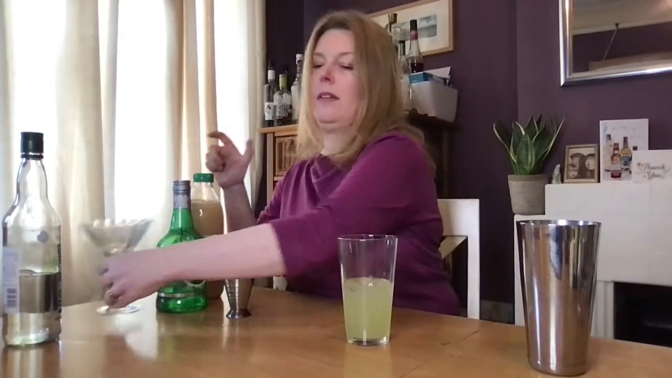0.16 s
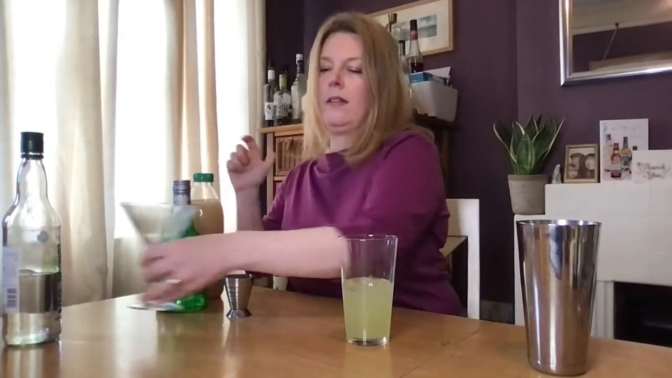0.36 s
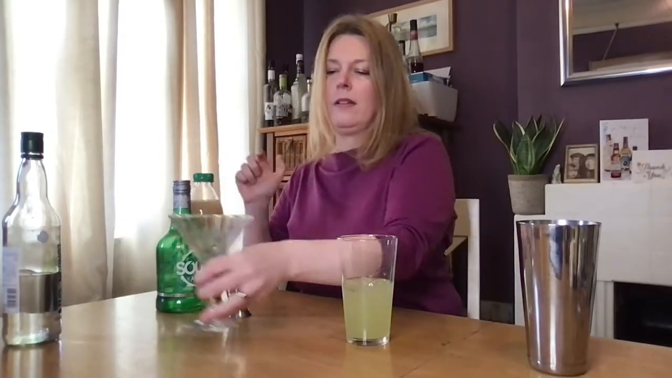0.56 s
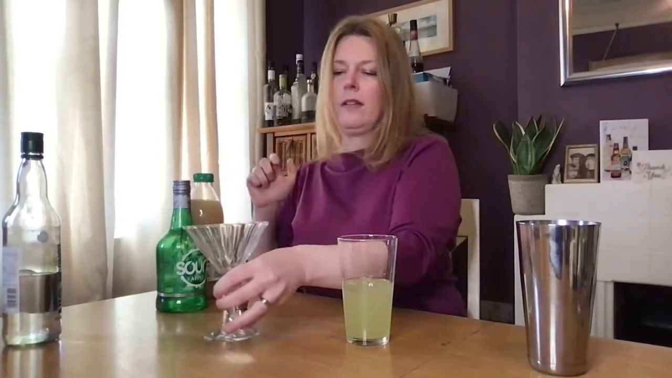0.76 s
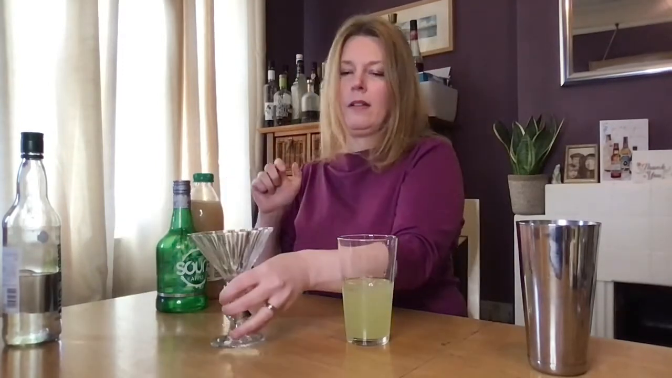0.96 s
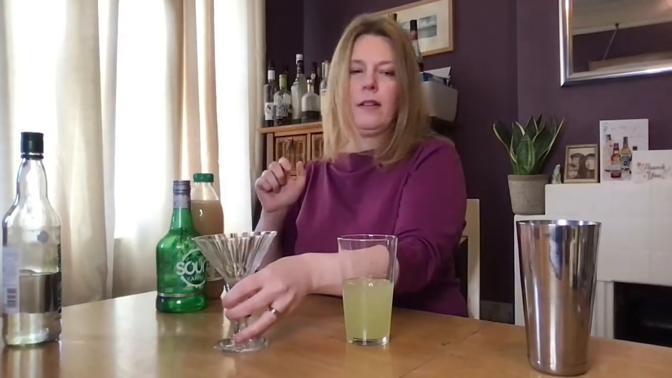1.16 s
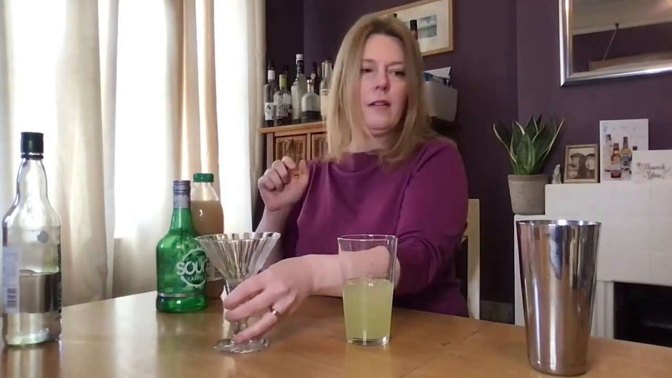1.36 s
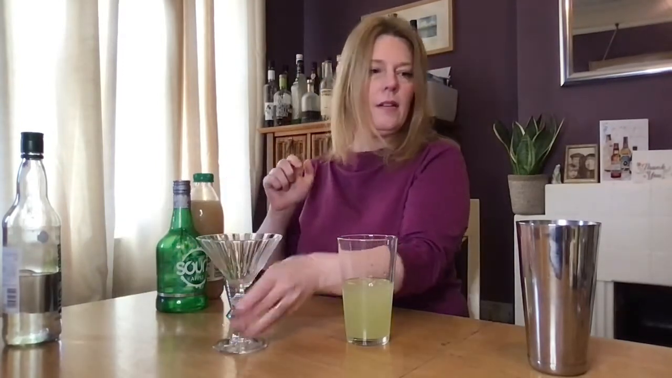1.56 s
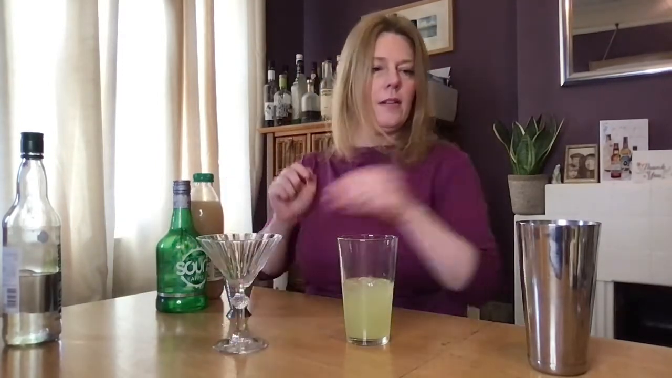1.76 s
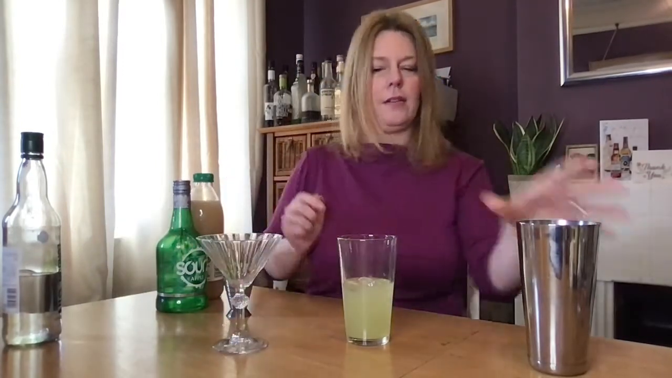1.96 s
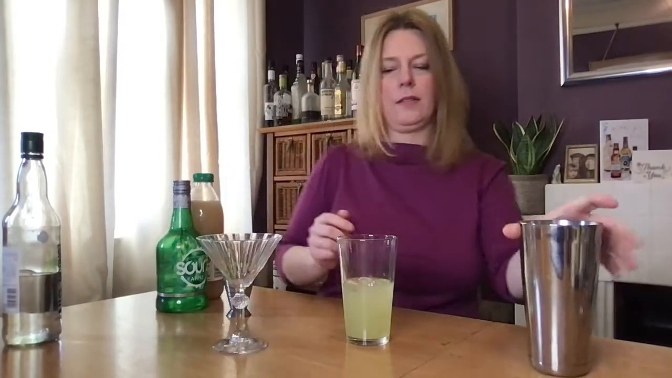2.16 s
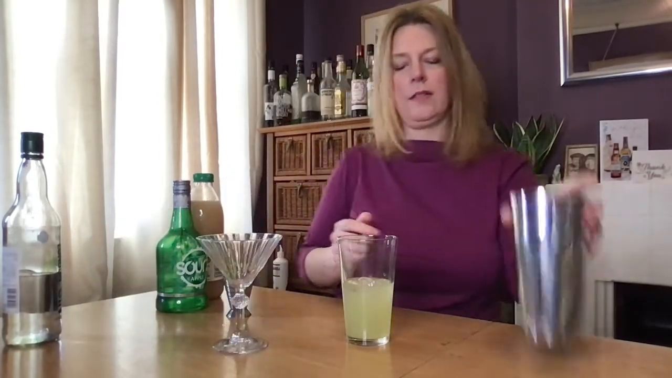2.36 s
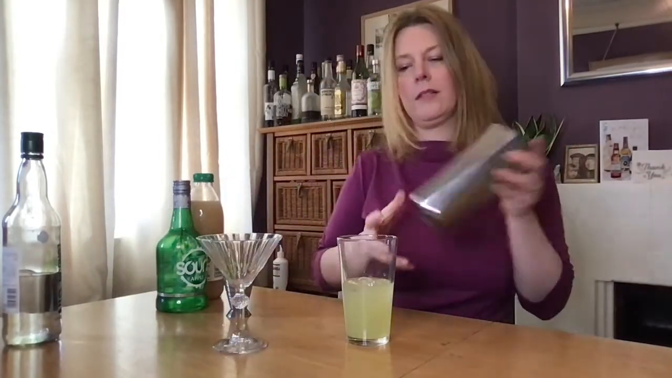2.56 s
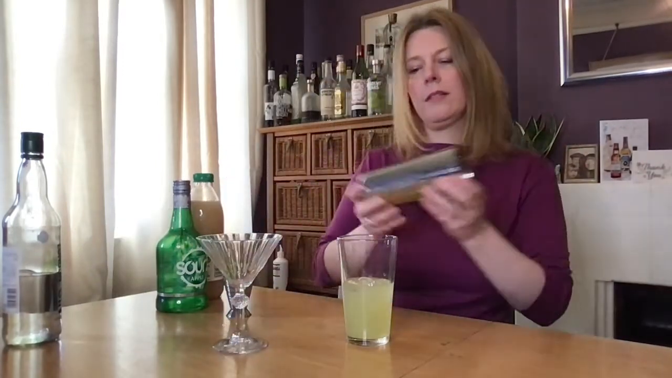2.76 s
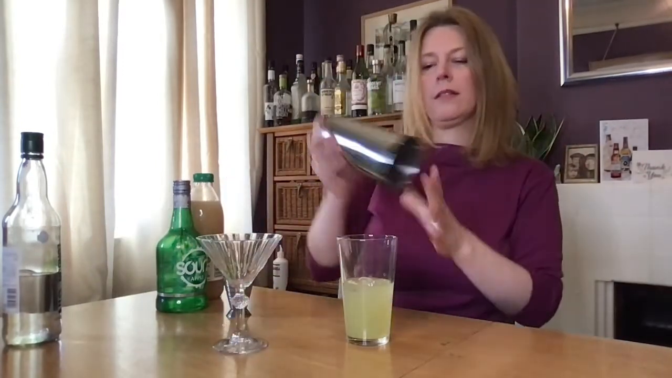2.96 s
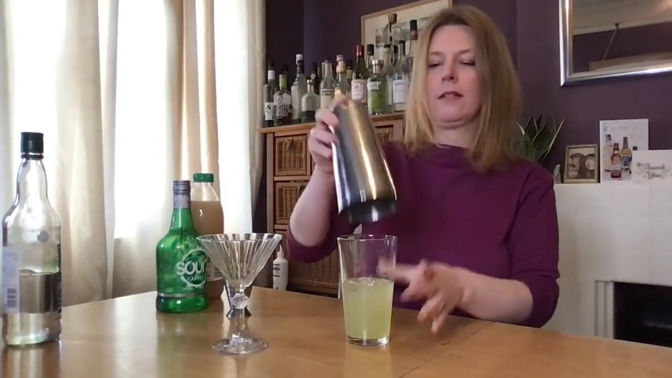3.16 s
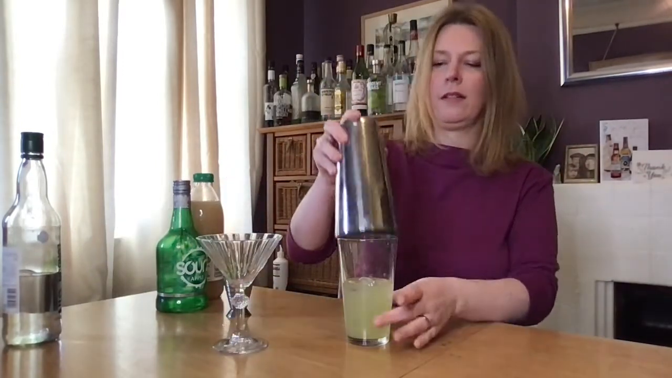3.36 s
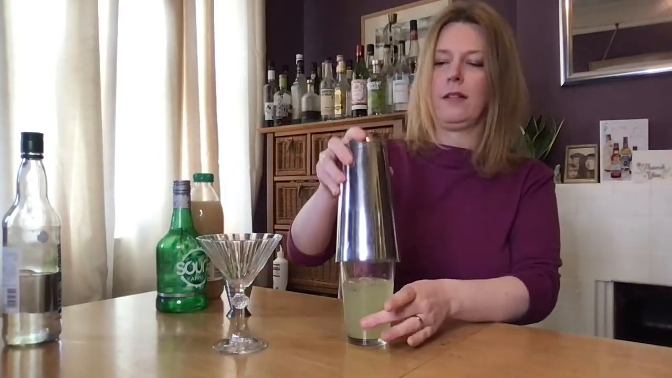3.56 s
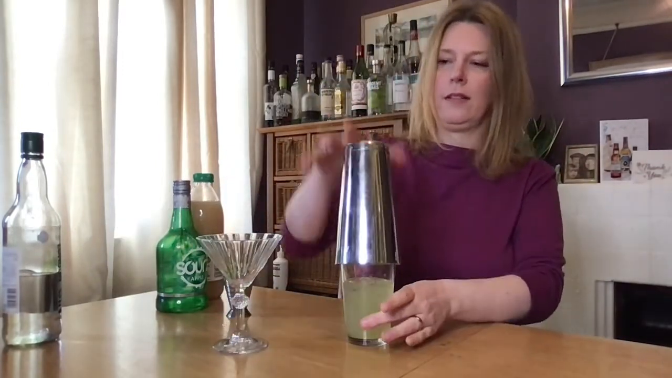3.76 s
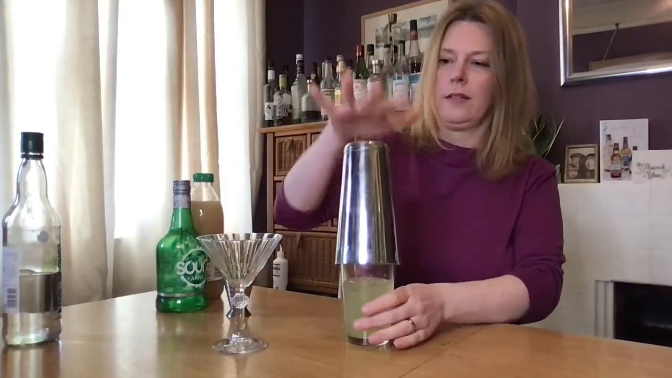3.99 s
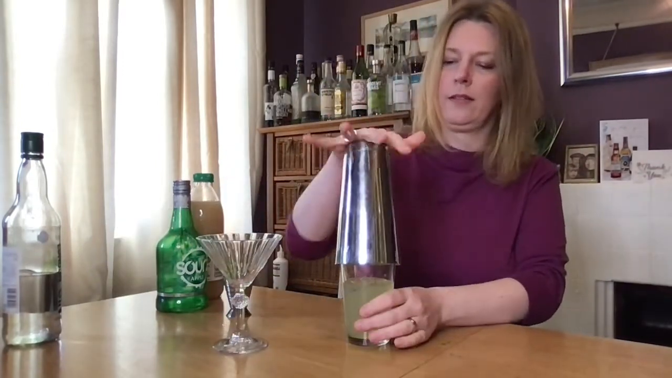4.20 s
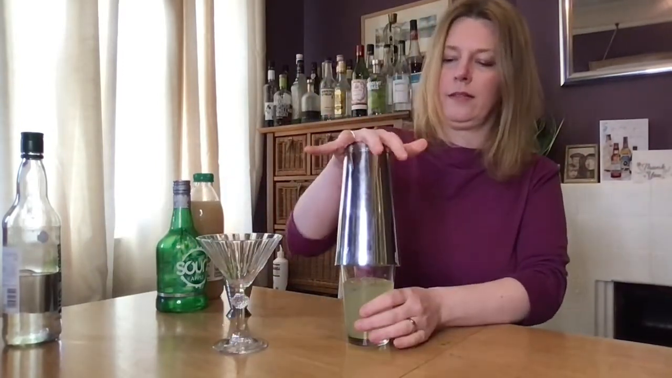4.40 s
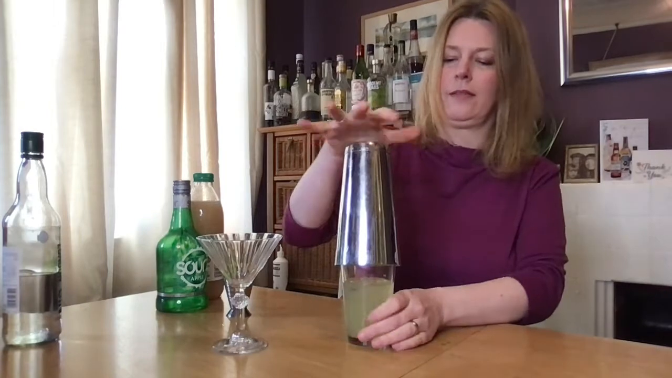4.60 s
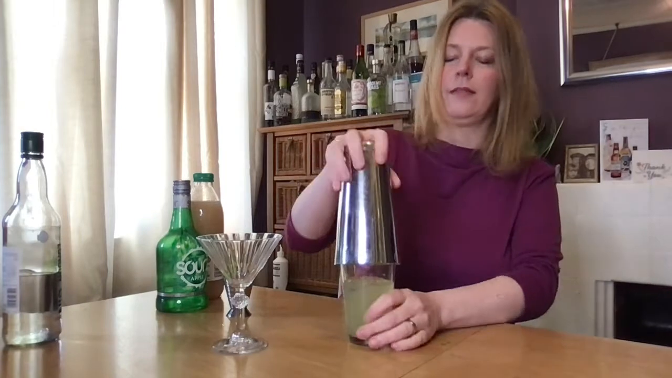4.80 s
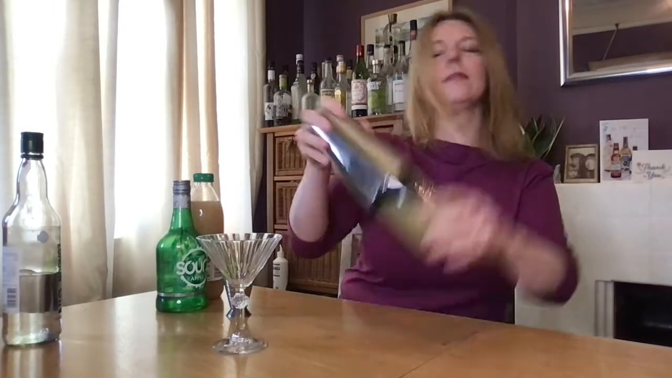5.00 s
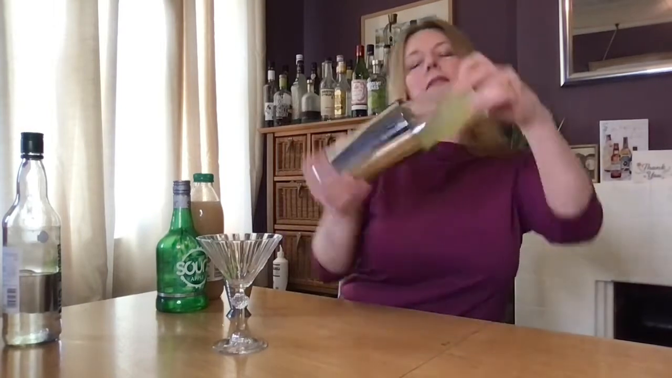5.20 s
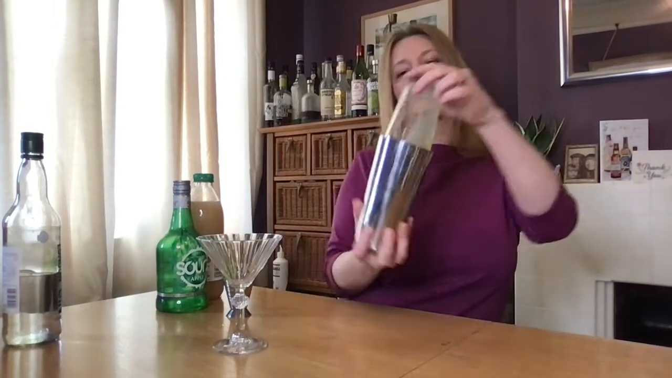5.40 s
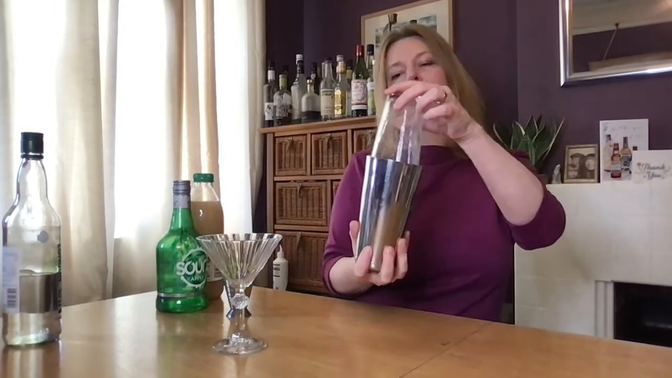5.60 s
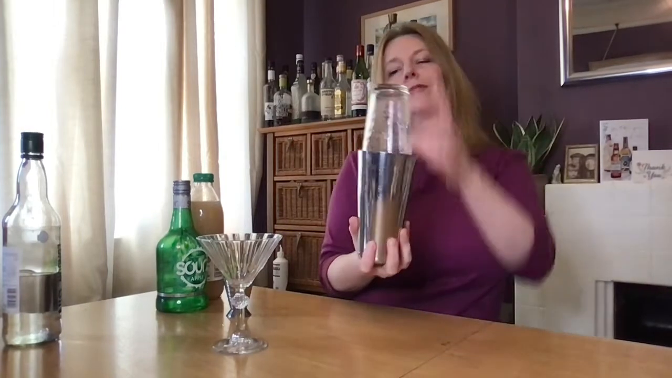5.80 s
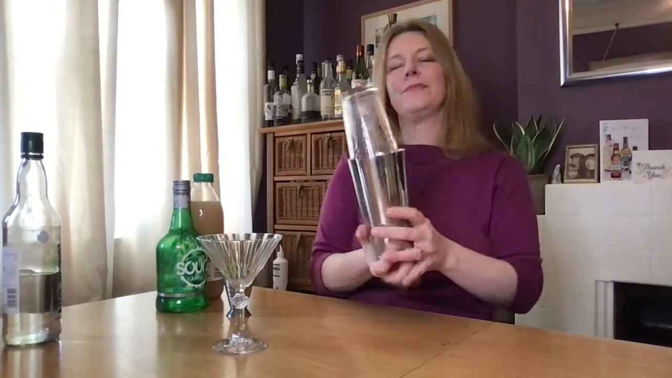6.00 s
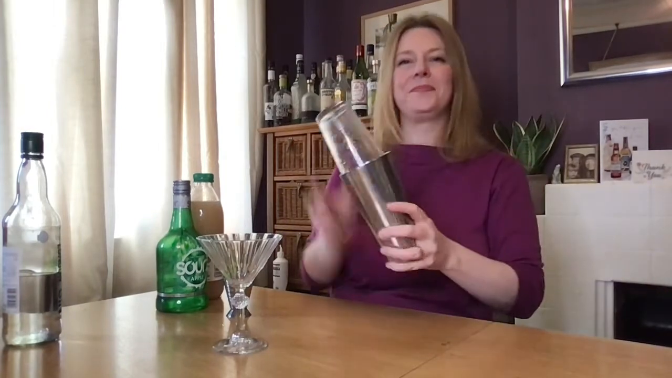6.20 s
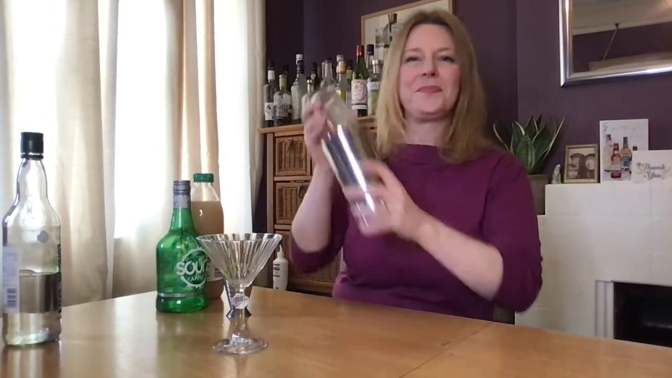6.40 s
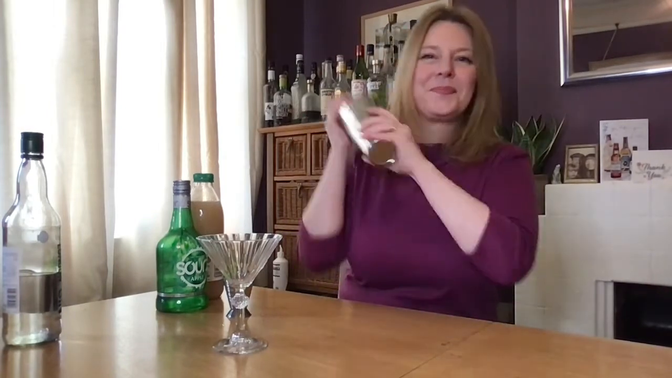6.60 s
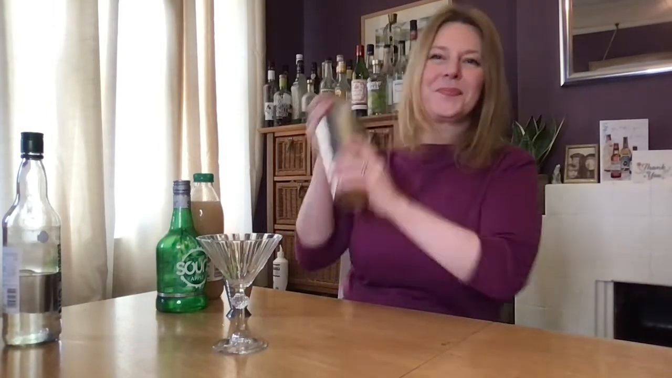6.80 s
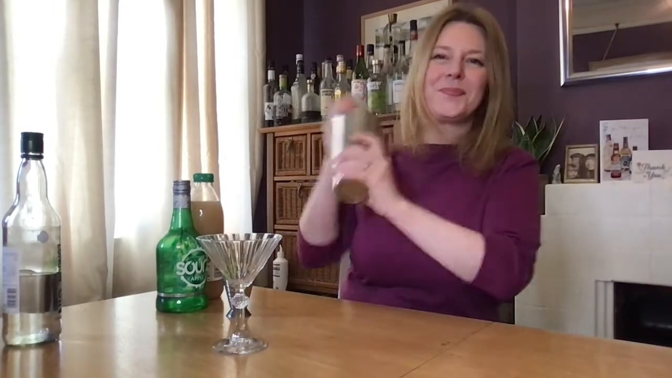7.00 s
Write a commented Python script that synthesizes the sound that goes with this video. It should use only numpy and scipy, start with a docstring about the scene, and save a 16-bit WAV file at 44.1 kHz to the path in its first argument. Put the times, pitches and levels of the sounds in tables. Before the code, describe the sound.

A glass lands on a wooden table, a steel tin clinks and is slapped tight, then ice tumbles and rattles in hard shakes.

```python
"""Cocktail shaken at a wooden table

In a small room a glass is set down; a steel tin is picked up, clinks over a mixing glass and is slapped tight.
The shaker is turned over, ice tumbles onto the tin's ringing base, and it is shaken hard.
Blows are decaying noise bursts, glass and steel are decaying sines, the ice mass is a stream of tiny
contacts, and the table's sway and the background are coloured noise.
"""
import sys
import numpy as np
from scipy import signal
from scipy.fft import rfft, irfft, next_fast_len
from scipy.io import wavfile
from scipy.ndimage import uniform_filter1d

SR = 44100
rng = np.random.default_rng(int(sys.argv[2]) if len(sys.argv) > 2 else 0)


def unload_audio(sound):
    """Save the sound as a 16-bit wav file, at the path given as the first command line argument."""
    columns = np.transpose(np.atleast_2d(sound))
    # keep every value between -1 and 1, then stretch to whole-number steps
    steps = np.round(np.clip(columns, -1, 1) * 32767)
    wavfile.write(sys.argv[1], SR, steps.astype(np.int16))


N = 310905
HIT_T_S = np.arange(SR * 2 // 5) / SR  # time axis of one hit


def amp(db):
    """Decibels to gain, floored at -400 dB."""
    return np.exp(np.maximum(db, -400) * np.log(10) / 20)


def unit(x):
    """Scale x to rms 1."""
    return x / np.sqrt(np.mean(x ** 2) + 1e-20)


def crest(x):
    """Scale x so that its loudest 4 ms have rms 1."""
    power = uniform_filter1d(x ** 2, size=176)
    return x / np.sqrt(power.max() + 1e-20)


def along(points, hz):
    """Interpolate (hz, value) points on a log frequency axis."""
    point_hz, value = np.transpose(points)
    return np.interp(np.log(hz + 1), np.log(point_hz), value)


def add(track, start_s, x):
    """Mix x into the track at start_s."""
    part = track[max(round(start_s * SR), 0):][:len(x)]
    part += x[:len(part)]


def colour(x, spectrum, size=4096):
    """Filter x with the minimum-phase response of this spectrum."""
    gain = amp(along(spectrum, np.fft.rfftfreq(size, 1 / SR)))
    cepstrum = irfft(np.log(gain))
    # fold the cepstrum: causal, minimum phase
    cepstrum[1:size // 2] *= 2
    cepstrum[size // 2 + 1:] = 0
    response = irfft(np.exp(rfft(cepstrum)))
    return signal.fftconvolve(x, response)[:len(x)]


def noise(spectrum):
    """Steady coloured noise at rms 1."""
    return unit(colour(rng.standard_normal(N), spectrum))


def burst(spectrum, t60_s):
    """Blow on many close modes: coloured noise that dies fast."""
    decaying = rng.standard_normal(len(HIT_T_S)) * amp(-60 * HIT_T_S / t60_s)
    return crest(colour(decaying, spectrum))


STRIKE_SCATTER_DB = 1.5  # standard deviation of each mode's strength


def ring(modes, weight_db=0, detune=0, split=0.024):
    """Modes of alternating sign, struck at new strengths; a tin is never quite round, so each has a beating twin."""
    hz, level_db, t60_s = np.transpose(modes)
    level_db = level_db + weight_db + STRIKE_SCATTER_DB * rng.standard_normal(len(hz))
    hz = hz * (1 + detune * rng.standard_normal())
    twin_hz = hz * (1 + split * rng.standard_normal(len(hz)))
    t = HIT_T_S[:, None]
    waves = np.sin(2 * np.pi * hz * t) + .5 * np.sin(2 * np.pi * twin_hz * t)
    signs = (-1.) ** np.arange(len(hz))
    return crest((waves * amp(level_db - 60 * t / t60_s)) @ signs)


# reverberation of the room: hz, t60_s
ROOM_T60 = [(100, 0.19), (400, 0.28), (1500, 0.25), (4000, 0.26), (8000, 0.25), (16000, 0.095)]


def in_room(x, wet_db):
    """Add a diffuse tail, new for each call, whose decay time depends on frequency."""
    hz, t, z = signal.stft(rng.standard_normal(len(HIT_T_S)), SR, nperseg=256)
    decayed = z * amp(-60 * t / along(ROOM_T60, hz)[:, None])
    tail = signal.istft(decayed, SR, nperseg=256)[1][:len(HIT_T_S)]
    tail *= 1 - np.exp(-HIT_T_S / 0.0032)
    wet = signal.fftconvolve(x, tail / np.linalg.norm(tail))[:len(x)]
    return x + amp(wet_db) * wet


def swell(start_s, rise_s, t60_s):
    """Gain with a Gaussian rise to 1 at start_s, then an exponential decay."""
    t = np.arange(N) / SR - start_s
    rise_db = -10 / np.log(10) * (t / rise_s) ** 2
    return amp(np.where(t < 0, rise_db, -60 * t / t60_s))


def favour(hz, pitch_hz, lift_db=9, octaves=0.19):
    """Extra dB that a contact gives to frequencies near its pitch."""
    return lift_db * np.exp(-(np.log2(hz / pitch_hz) / octaves) ** 2)


def pitched(spectrum, pitch_hz):
    """The spectrum with a resonance at the contact's pitch."""
    hz = np.geomspace(150, 16000, 80)
    return np.column_stack([hz, along(spectrum, hz) + favour(hz, pitch_hz)])


# low rumble of the room: hz, relative_db
RUMBLE_SPECTRUM = [(20, -14), (42, 4), (60, 3), (85, -18), (170, -21), (300, -29), (1000, -65)]
# hiss: hz, relative_db
HISS_SPECTRUM = [(100, -20), (170, -3), (250, -13.5), (600, -15), (1700, -18), (3500, -22.5), (6500, -24),
                 (16000, -32.5)]
RUMBLE_DB, HISS_DB = -60, -74  # rms


def background():
    """Faint hiss over the low rumble of the room, both steady coloured noise."""
    return amp(RUMBLE_DB) * noise(RUMBLE_SPECTRUM) + amp(HISS_DB) * noise(HISS_SPECTRUM)


# thud of the table top: hz, relative_db
THUD_SPECTRUM = [(35, -28), (80, 0), (140, 3), (240, 2.5), (400, -4), (700, -11.5), (950, -21.5),
                 (2000, -71.5)]
# rap of a harder contact: hz, relative_db
RAP_SPECTRUM = [(300, -19), (750, -14), (1150, 2.5), (1600, 3), (2100, -6), (3000, -23.5), (6000, -49.5)]
# tick of a harder contact: hz, relative_db
TICK_SPECTRUM = [(1500, -22), (3000, 0), (4200, 0.5), (7200, -7.5), (9000, -32.5), (16000, -25)]
TICK_HZ, TICK_DB, TICK_GROWTH_DB_PER_DB = 4250, -17, 1.45  # tick re thud at hardness 0; growth with hardness


def knock(hardness_db, t60_s):
    """One blow on the table top; a harder contact adds more rap and tick to the thud."""
    thud = burst(THUD_SPECTRUM, t60_s)
    rap = amp(hardness_db) * burst(RAP_SPECTRUM, t60_s * 0.63)
    tick_db = TICK_DB + TICK_GROWTH_DB_PER_DB * hardness_db
    tick = amp(tick_db) * burst(pitched(TICK_SPECTRUM, TICK_HZ), t60_s * 0.34)
    return crest(in_room(thud + rap + tick, wet_db=-6))


# glass, tin and fingers on the table: start_s, level_db, hardness_db (rap re thud), t60_s (thud)
TABLE_KNOCKS = [(.04, -48, -16.5, .22), (1.1718, -26.5, -11, 0.066), (1.189, -25.5, -15, 0.089),
                (1.429, -32.5, -6.5, 0.19), (1.438, -24, -8, 0.066), (2.112, -46, -9, 0.2),
                (2.183, -31.5, -24.5, 0.13), (2.266, -43, -26, 0.066), (2.732, -53, -22, .09),
                (3.571, -34.5, -9.5, .045), (3.734, -26.5, -13.5, 0.087), (3.769, -29, -21, 0.072),
                (4.111, -49.5, -31, .05), (4.811, -36.5, -14.5, 0.13)]
# palm slaps the tin tight: start_s, level_db, hardness_db (rap re thud)
PALM_SLAPS = [(4.198, -19.5, -16), (4.549, -20.5, -18)]
SLAP_T60_S = 0.047  # damped by the palm


def knocks():
    """Knocks and palm slaps sound the wooden table top."""
    out = np.zeros(N)
    for start_s, level_db, hardness_db, t60_s in TABLE_KNOCKS:
        add(out, start_s, amp(level_db) * knock(hardness_db, t60_s))
    for start_s, level_db, hardness_db in PALM_SLAPS:
        add(out, start_s, amp(level_db) * knock(hardness_db, SLAP_T60_S))
    return out


# cocktail glass modes: hz, level_db, t60_s
GLASS_MODES = [(1680, -64.5, 1.2), (3780, -50.5, 0.16)]
SET_DOWN_S = 1.172


def cocktail_glass():
    """The glass rings in two decaying modes as it lands."""
    out = np.zeros(N)
    for hz, level_db, t60_s in GLASS_MODES:
        add(out, SET_DOWN_S, amp(level_db - 60 * HIT_T_S / t60_s) * np.sin(2 * np.pi * hz * HIT_T_S))
    return out


# arms and tin lean on the table: peak_s, level_db, rise_s
TABLE_BUMPS = [(1.99, -42, 0.042), (2.42, -43.5, 0.025), (2.52, -43, 0.033), (3.44, -38.5, 0.0084),
               (3.579, -32, .021), (3.78, -33.5, .034), (4.13, -44, 0.023), (4.476, -44.5, 0.011),
               (4.705, -27, 0.0045)]
# sway of the table: hz, relative_db
SWAY_SPECTRUM = [(20, -3.5), (45, -5.5), (85, 1.5), (135, -4), (200, -17.5), (400, -35), (800, -41.5),
                 (1800, -40.5), (5000, -66)]
SWAY_T60_S, SLAP_RISE_S, SLAP_SWAY_DB = 0.39, 0.0028, -13.5  # slap sway re slap knock


def sway():
    """Leaning and palm slaps sway the table: low noise that swells and dies away."""
    shoves = sum(amp(level_db) * swell(peak_s, rise_s, SWAY_T60_S) for peak_s, level_db, rise_s in TABLE_BUMPS)
    for start_s, level_db, _ in PALM_SLAPS:
        shoves += amp(level_db + SLAP_SWAY_DB) * swell(start_s + SLAP_RISE_S, SLAP_RISE_S, SWAY_T60_S)
    return shoves * noise(SWAY_SPECTRUM)


# tin is lifted, its rim meets the glass:
# start_s, level_db, seated (0-1), scrape_db (re ring), lean_db_per_octave (to high modes)
RIM_CONTACTS = [(2.2, -70, 0, -12, -1), (2.735, -54.5, 0, -5, 17), (3.41, -27.5, 0, 0.5, 0.5),
                (3.475, -29, 0, -8.5, 5.5), (3.542, -32, 0, 2, -8), (3.567, -31.5, 1, -1, 2),
                (3.5722, -20.5, 1, -3.5, 4.5), (3.583, -27.5, 1, -6, -13), (4.215, -53, 1, 1, 0)]
# tin hanging free: hz, relative_db, t60_s
FREE_TIN_MODES = [(1860, 9, 0.43), (2774, -1, 0.3), (4320, -1, 0.38), (4430, -2.5, .15), (4620, -23.5, .15),
                  (5250, -9.5, 0.078), (6550, -8.5, 0.17), (7400, -8.5, 0.24), (9475, -30, .17),
                  (11100, -32, .17)]
# tin seated on the glass: hz, relative_db, t60_s
SEATED_TIN_MODES = [(916, -2, 0.1), (1102, -2.5, .12), (1700, 1.5, 0.2), (1850, -9, .12), (2233, -8, 0.16),
                    (2752, 0, 0.11), (3200, -17, .22), (4230, -8, .15), (4300, -4.5, .17), (4750, 2, 0.14),
                    (5114, -9, 0.1), (6240, -11, 0.17), (9670, -17.5, 0.12)]
# scrape of the rim: hz, relative_db
SCRAPE_SPECTRUM = [(300, -5), (900, -8.5), (1400, -10.5), (2300, -2), (3500, -13.5), (4600, -3.5),
                   (7000, -13.5), (16000, -24.5)]


def tin():
    """The empty tin rings freely as it touches the glass, and differently once it wedges on."""
    out = np.zeros(N)
    for start_s, level_db, seated, scrape_db, lean_db_per_octave in RIM_CONTACTS:
        modes = SEATED_TIN_MODES if seated > .5 else FREE_TIN_MODES
        octaves = np.log2(np.array(modes)[:, 0] / modes[0][0])
        clink = ring(modes, weight_db=lean_db_per_octave * octaves, split=0.011)
        scrape = amp(scrape_db) * burst(SCRAPE_SPECTRUM, t60_s=0.14)
        add(out, start_s, amp(level_db) * crest(in_room(clink + scrape, wet_db=-10.5)))
    return out


# tin wall: hz, relative_db, t60_s
WALL_MODES = [(2766, -2.5, 0.075), (3040, 3, 0.034), (3226, -2, 0.019), (3997, -2, 0.027),
              (4180, -2, 0.064), (4670, 0, 0.024), (5390, -0.5, 0.029), (6530, -2.5, 0.024),
              (7460, -16.5, 0.098)]
# tin base under liquid: hz, relative_db, t60_s
BASE_MODES = [(1428, -12, 0.04), (1541, 1, 0.024), (1663, 3.5, 0.049)]
# clack: hz, relative_db
CLACK_SPECTRUM = [(150, -41), (500, -28), (1000, -13.5), (1500, -4.5), (2200, 0.5), (3500, 1.5), (5300, -3),
                  (7000, -7.5), (10000, -42), (16000, -36.5)]
# crack: hz, relative_db
CRACK_SPECTRUM = [(3000, -40), (6500, -5), (8000, 4), (11000, 3), (13000, -1), (16000, -2)]


def cube(level_db, pitch_hz, base_db, crack_db):
    """A cube clacks around its own pitch and rings the steel; the moving liquid shifts the modes a little."""
    # a cube that rings the base has hit steel and rings the wall too; otherwise it mostly clacks
    on_steel = 1 / (1 + amp(-(base_db + 7.5)) ** 2)
    clack = np.sqrt(1 - on_steel) * burst(pitched(CLACK_SPECTRUM, pitch_hz), t60_s=0.041)
    wall_lift_db = favour(np.array(WALL_MODES)[:, 0], pitch_hz)
    wall = np.sqrt(on_steel) * ring(WALL_MODES, weight_db=wall_lift_db, detune=0.022, split=0.025)
    base = amp(base_db - 1.5) * ring(BASE_MODES, detune=.018)
    crack = amp(crack_db) * burst(CRACK_SPECTRUM, t60_s=0.026)
    return amp(level_db) * in_room(clack + wall + base + crack, wet_db=-2.5)


# single cubes that stand out; the first row is the tin clinking on the glass as it is lifted:
# start_s, level_db (clack and wall), pitch_hz,
# base_db (1.5 dB above the base ring re clack and wall), crack_db (re clack and wall)
CLINK_AND_CUBES = [(4.708, -33, 2880, -3, 2.5), (4.877, -41.5, 3760, -9.5, -21),
                   (4.926, -47, 2910, -16, -18), (4.959, -48.5, 3930, -6, -16),
                   (4.981, -42, 3820, -10, -14), (5.041, -41, 3030, -6, -12),
                   (5.119, -47.5, 3130, -8.5, -19), (5.2537, -39, 4940, -14, -22),
                   (5.298, -40.5, 2700, -9.5, -12.5), (5.3223, -34, 2550, -14, -19),
                   (5.3984, -17, 2960, -2, -15), (5.404, -24.5, 2970, 5, -11.5),
                   (5.4323, -19.5, 3250, -7.5, -9), (5.4504, -19.5, 5040, -13, -4),
                   (5.484, -23.5, 5300, -19, -3), (5.5109, -27, 3280, 5, -8),
                   (5.6221, -25.5, 3400, 14, -13.5), (5.6932, -24, 3500, -17, -14.5),
                   (5.753, -30, 2360, -18, -12), (5.775, -34.5, 3800, 2.5, -7),
                   (5.9312, -35.5, 3570, -4.5, -7.5), (6.084, -28, 4400, -10.5, -6.5),
                   (6.2398, -36, 3670, 2.5, -14), (6.329, -35, 3620, -12, -28.5),
                   (6.486, -39, 2400, -5, -16), (6.685, -24, 4400, -39, -8.5), (6.797, -21.5, 3650, 3, -8),
                   (6.9406, -25.5, 2400, 4, -16), (7.032, -24, 3530, -34, -26)]


def clink_and_cubes():
    """The lifted tin clinks on the glass, then the cubes that stand out strike one by one."""
    out = np.zeros(N)
    for start_s, *blow in CLINK_AND_CUBES:
        add(out, start_s, cube(*blow))
    return out


# churn of loose ice as the shaker is turned over and swung: time_s, rattle_db (before TUMBLE_DB)
ICE_CHURN = [(5.26, -60), (5.4, -46), (5.9, -56), (5.97, -43.5), (6.1, -54), (6.3, -58), (6.5, -50),
             (6.62, -43.5), (6.9, -44.5), (7.05, -35.5)]
# ice and drink land on one end, only the steel end booms: peak_s, rattle_db (before TUMBLE_DB), slosh_db (re rattle)
ICE_LANDINGS = [(5.461, -25.5, 2), (5.724, -35, 5.5), (6.702, -22.5, -44), (6.836, -25, -1.5),
                (6.987, -29, -23)]
CHURN_SLOSH_DB = -4  # re rattle
LANDING_RISE_S, LANDING_T60_S = .015, .185


def agitation():
    """Gains of rattle and slosh: churning that rises and falls, plus a swell for each landing."""
    churn = amp(np.interp(np.arange(N) / SR, *np.transpose(ICE_CHURN), left=-np.inf))
    landings = np.array([amp(rattle_db) * swell(peak_s, LANDING_RISE_S, LANDING_T60_S)
                         for peak_s, rattle_db, _ in ICE_LANDINGS])
    landing_slosh = amp(np.array(ICE_LANDINGS)[:, 2])
    rattle = churn + landings.sum(axis=0)
    slosh = amp(CHURN_SLOSH_DB) * churn + landing_slosh @ landings
    return rattle, slosh


def grains(rate_hz, spread_db, cycles):
    """Tiny contacts at a changing rate, each a few cycles at its own pitch and size."""
    starts = np.flatnonzero(rng.random(N) < rate_hz / SR)
    pitch, loud, phase = rng.standard_normal((len(starts), 3)).T[:, :, None]
    hz = np.clip(3800 * np.exp(.6 * pitch), 500, 12000)
    t = HIT_T_S[:512]
    size = amp(spread_db * np.clip(loud, -2, 2))
    waves = size * np.exp(-hz * t / cycles) * np.cos(2 * np.pi * (hz * t + phase))
    places = starts[:, None] + np.arange(len(t))
    out = np.bincount(places.ravel(), waves.ravel(), N + len(t))[:N]
    return out / np.sqrt(rate_hz + 1)  # level independent of density


# air pockets in the drink: start_s, level_db (half amplitude, before TUMBLE_DB), start_pitch_hz
AIR_GLUGS = [(5.46, -42, 393), (5.698, -36.5, 524), (5.711, -32, 708), (5.785, -34.5, 1040),
             (5.868, -44.5, 846), (6.46, -48, 379)]


def glugs():
    """Air pockets sound as decaying sines; a bubble's pitch rises as it nears the surface."""
    out = np.zeros(N)
    t = HIT_T_S
    for start_s, level_db, pitch_hz in AIR_GLUGS:
        envelope = amp(level_db - 60 * t / 0.063) * (1 - np.exp(-t / 0.0013))
        add(out, start_s, envelope * 2 * np.sin(2 * np.pi * pitch_hz * t * (1 + 2.4 * t)))
    return out


# rattle of the ice mass: hz, relative_db
RATTLE_SPECTRUM = [(600, -20.5), (1500, -7), (2200, 4.5), (3000, -0.5), (4400, 1.5), (5500, -4.5),
                   (7000, -5), (10000, -36), (16000, -55.5)]
# slosh of the drink: hz, relative_db
SLOSH_SPECTRUM = [(120, -25), (250, -12), (450, -11.5), (700, -14), (1050, -6), (1300, -5), (1480, -5.5),
                  (1660, 0), (1850, -5), (2600, -15)]
SPLINTER_DB, CLATTER_DB = -12.5, -13  # re rattle in the hardest landing
HARD_POWER = 0.26  # splinter and clatter share grows as force to this power
CLATTER_HZ = 5150  # ice on glass
TUMBLE_DB = -4.0  # gain on the whole tumble


def tumble(rattle, slosh):
    """Ice and drink churn and hit the ends: the harder they land, the denser and brighter the contacts."""
    force = rattle / rattle.max()
    hard = rattle * force ** HARD_POWER
    contacts = grains(3000 * force ** .35, spread_db=2, cycles=3.6)
    layers = [(RATTLE_SPECTRUM, rattle),
              (SLOSH_SPECTRUM, slosh),
              (CRACK_SPECTRUM, amp(SPLINTER_DB) * hard),
              (pitched(CLACK_SPECTRUM, CLATTER_HZ), amp(CLATTER_DB) * hard)]
    out = glugs()
    for spectrum, gain in layers:
        layer = colour(contacts, spectrum)
        out += gain * layer / np.std(layer[force > .05])
    return amp(TUMBLE_DB) * in_room(out, wet_db=-7)


LOOSE_GAP_S, LOOSE_DB, LOOSE_SPREAD_DB = .03, -0.5, 3  # mean gap, level re rattle gain, scatter
LOOSE_HZ, LOOSE_OCTAVES = 3440, .3  # median pitch, scatter
LOOSE_BASE_DB, LOOSE_CRACK_DB = -12, -17  # as in CLINK_AND_CUBES


def loose_cubes(rattle):
    """Stray cubes knock about, one at random within each short slot, as hard as the ice rattles."""
    out = np.zeros(N)
    for slot_s in np.arange(ICE_CHURN[0][0], N / SR - LOOSE_GAP_S, LOOSE_GAP_S):
        start_s = slot_s + LOOSE_GAP_S * rng.random()
        loud, pitch = np.clip(rng.standard_normal(2), -2, 2)
        level_db = LOOSE_DB + LOOSE_SPREAD_DB * loud
        pitch_hz = LOOSE_HZ * 2 ** (LOOSE_OCTAVES * pitch)
        hit = cube(level_db, pitch_hz, LOOSE_BASE_DB, LOOSE_CRACK_DB)
        add(out, start_s, rattle[int(start_s * SR)] * hit)
    return out


def scene():
    """Sum of all sources as heard from the far edge of the table, one channel."""
    rattle, slosh = agitation()
    table = knocks() + cocktail_glass() + sway()
    shaker = tin() + clink_and_cubes() + tumble(rattle, slosh) + loose_cubes(rattle)
    return (background() + table + shaker)[None]


TOP_HZ = 16200


def record(dry):
    """Band limit: nothing passes at or above TOP_HZ."""
    size = next_fast_len(N + SR)
    passed = np.fft.rfftfreq(size, 1 / SR) < TOP_HZ
    return irfft(rfft(dry, size) * passed, size)[:, :N]


dry = scene()
out = record(dry)
unload_audio(out)
```